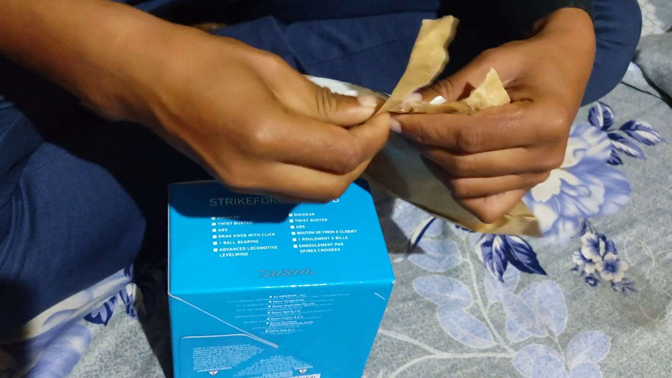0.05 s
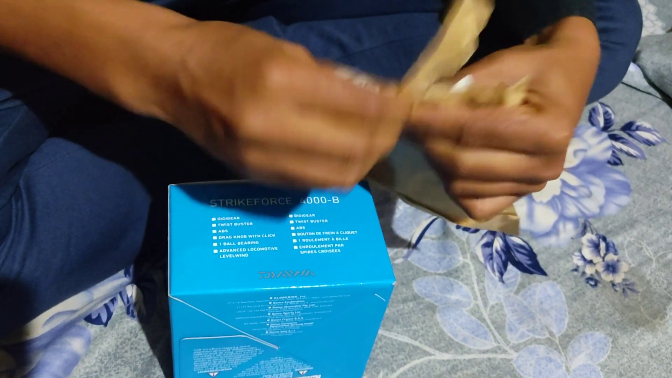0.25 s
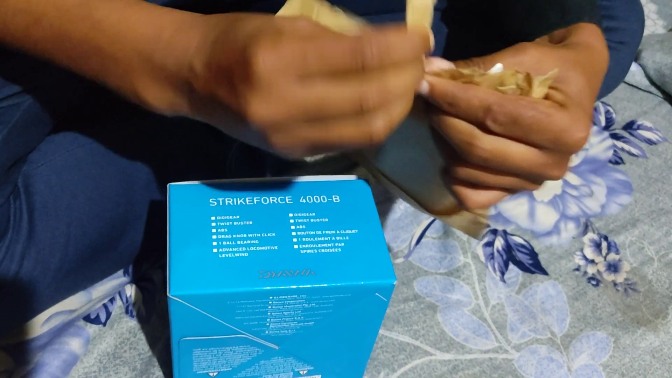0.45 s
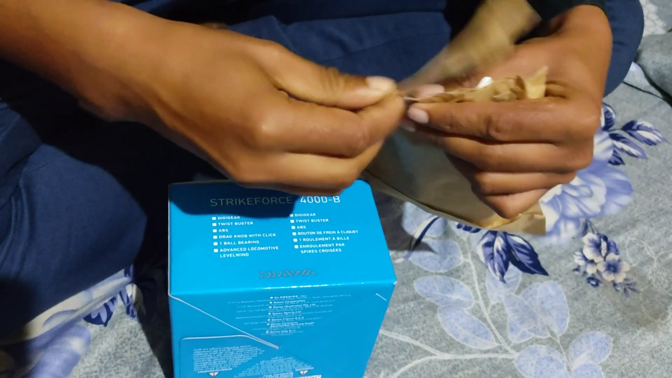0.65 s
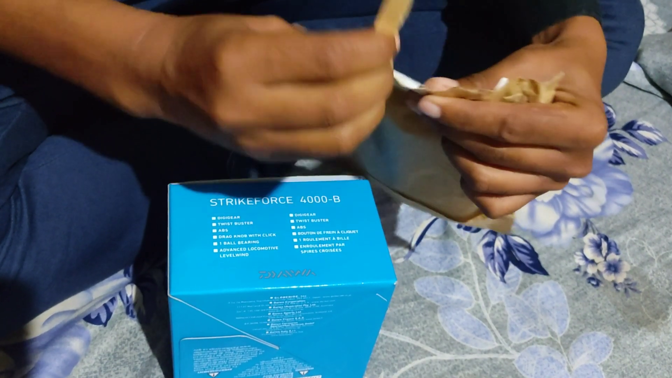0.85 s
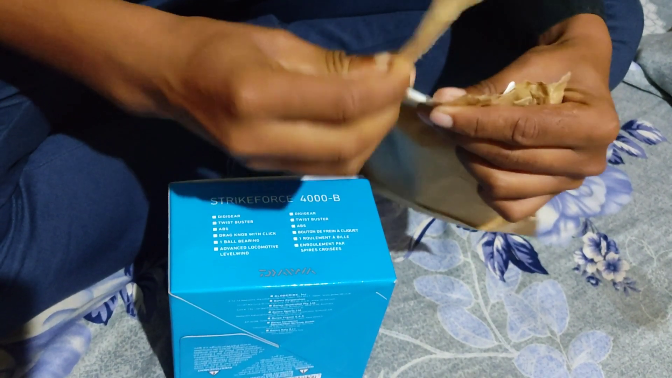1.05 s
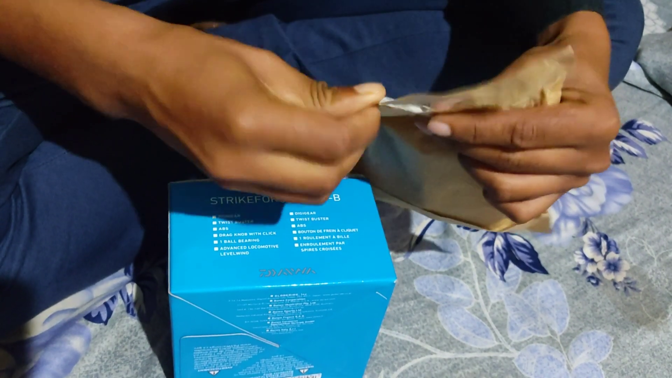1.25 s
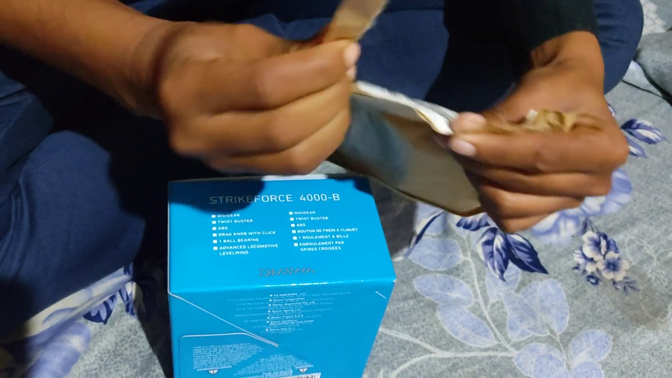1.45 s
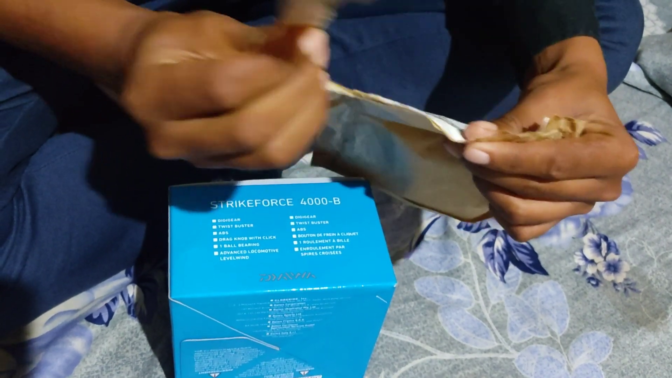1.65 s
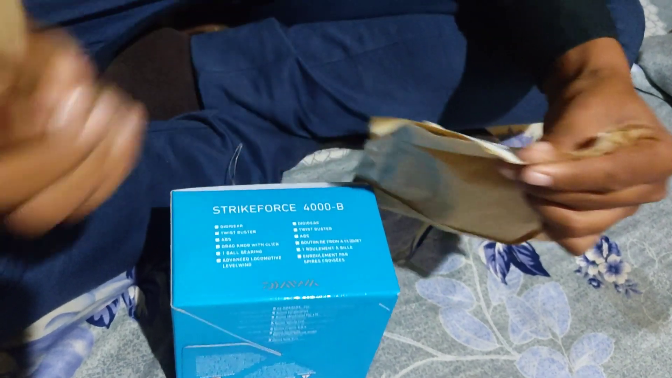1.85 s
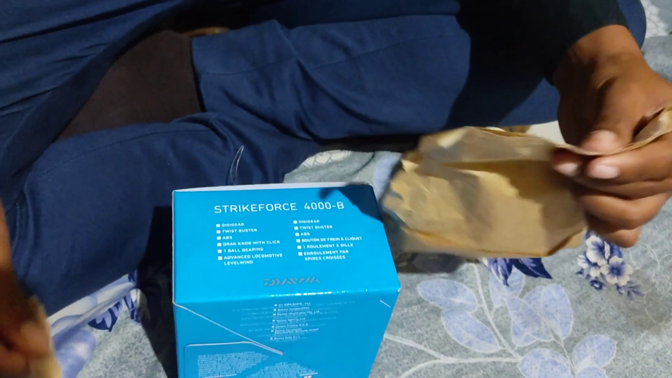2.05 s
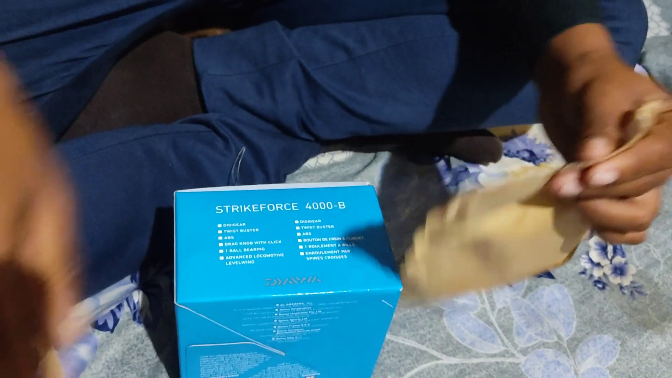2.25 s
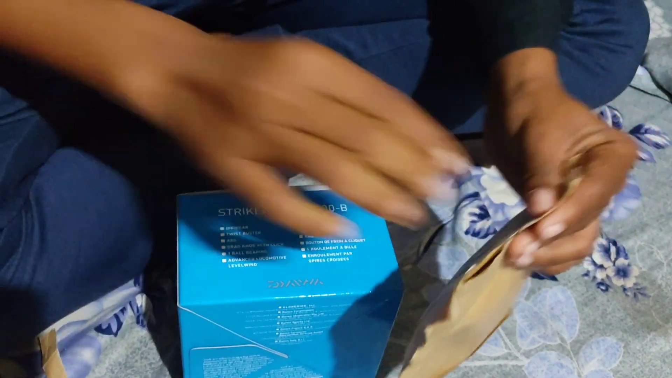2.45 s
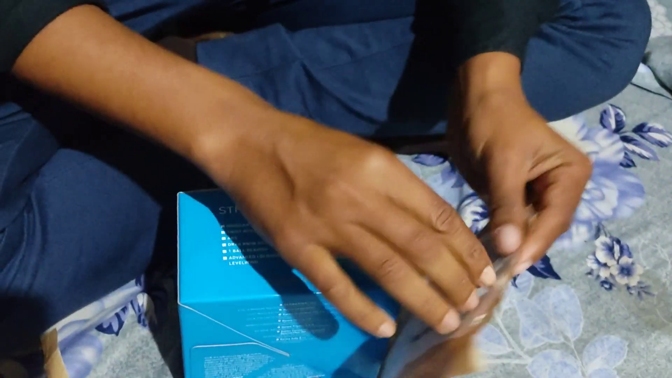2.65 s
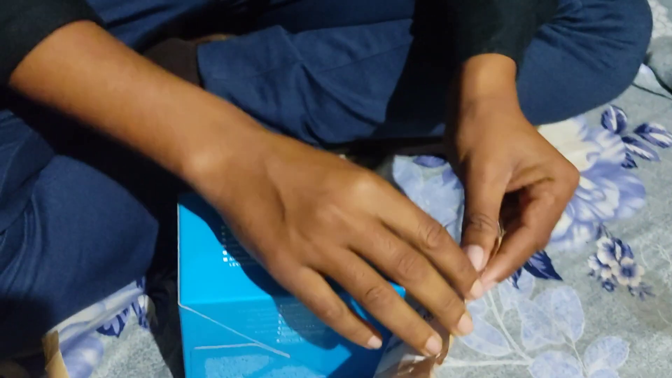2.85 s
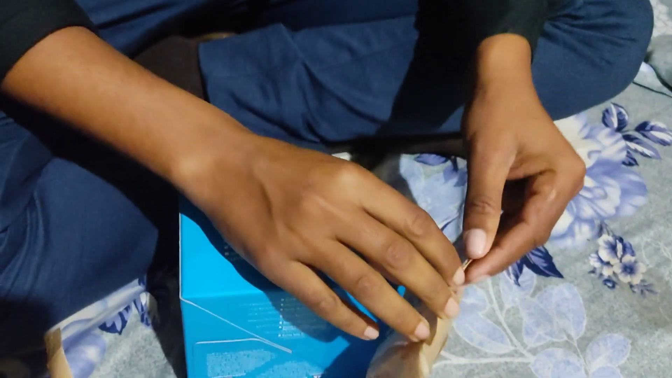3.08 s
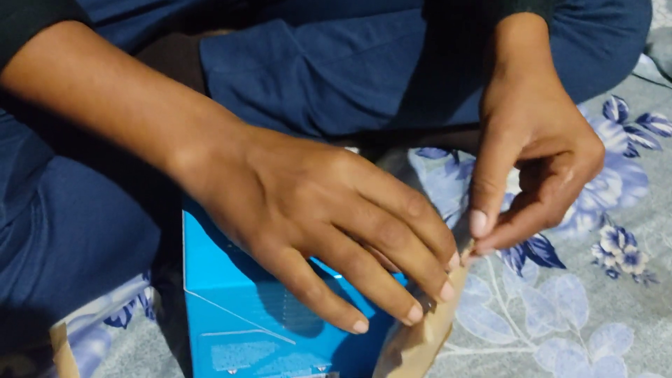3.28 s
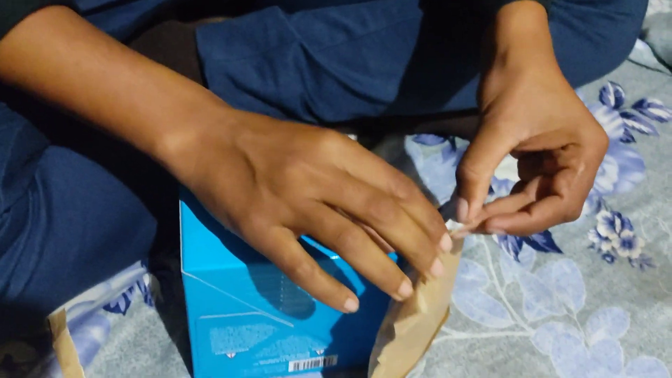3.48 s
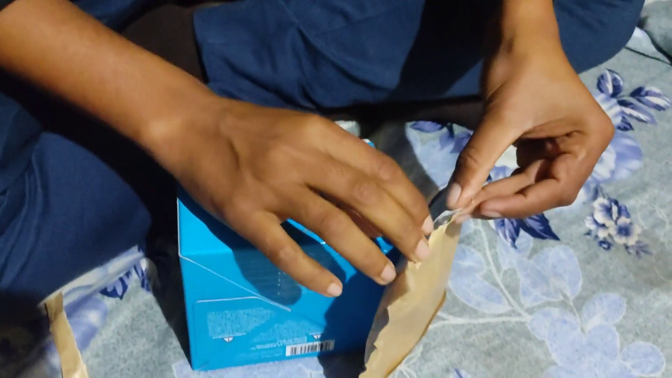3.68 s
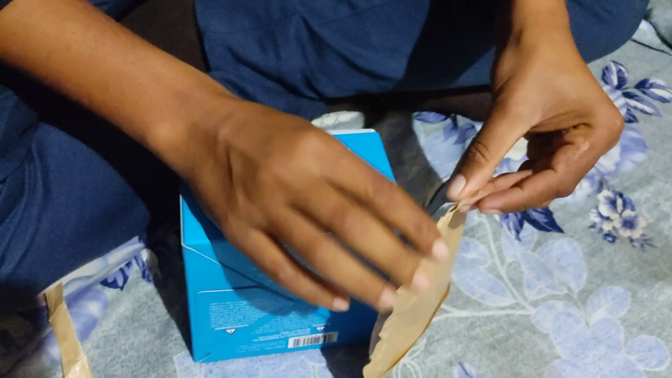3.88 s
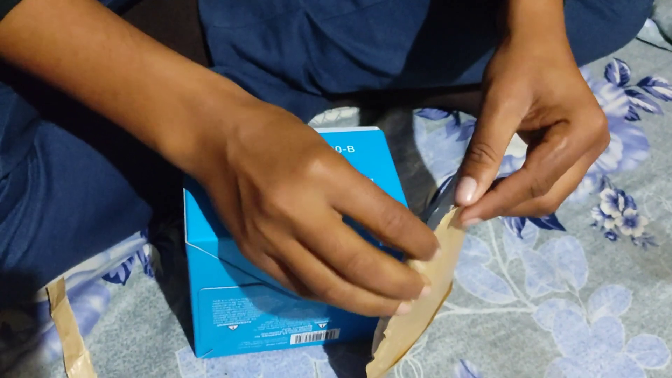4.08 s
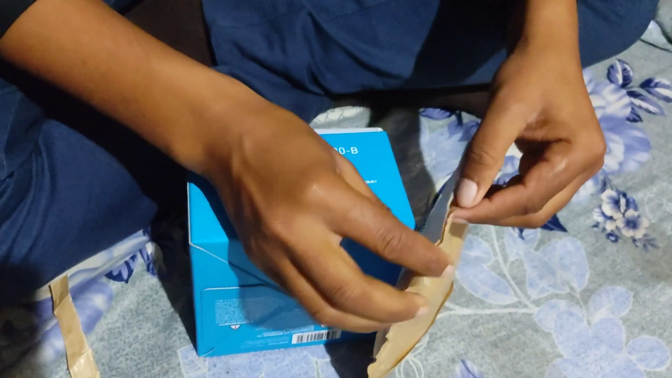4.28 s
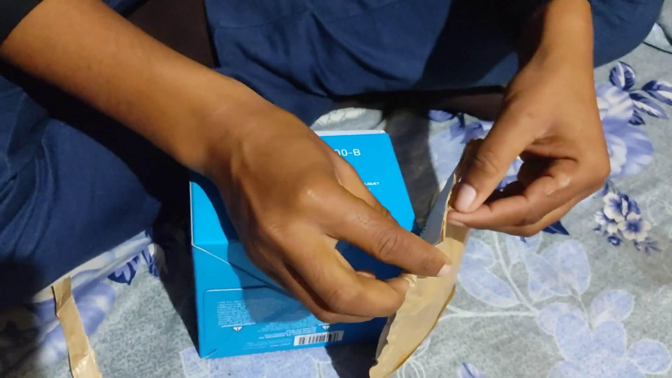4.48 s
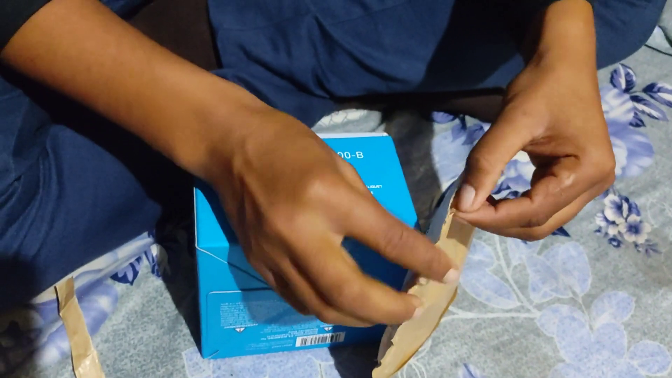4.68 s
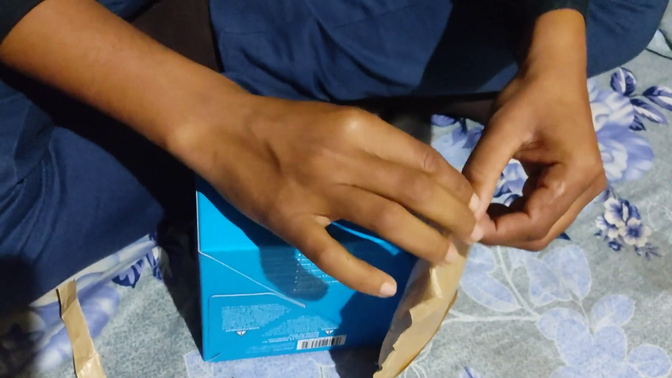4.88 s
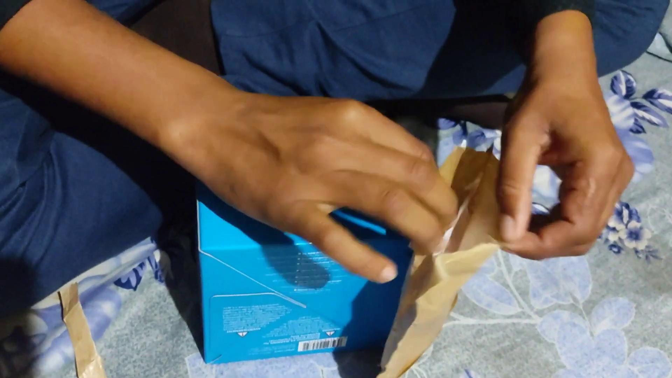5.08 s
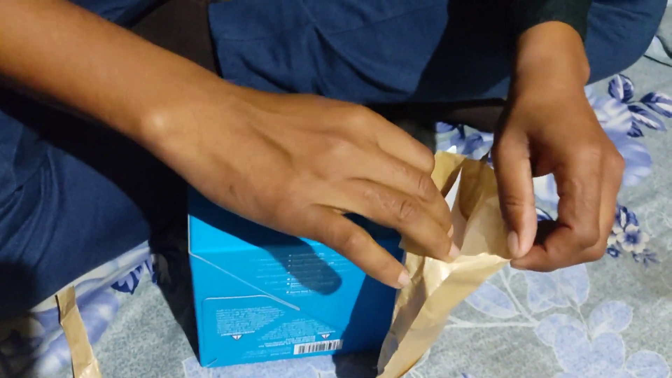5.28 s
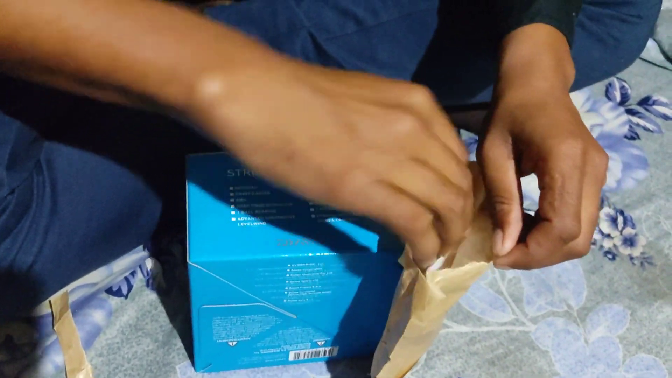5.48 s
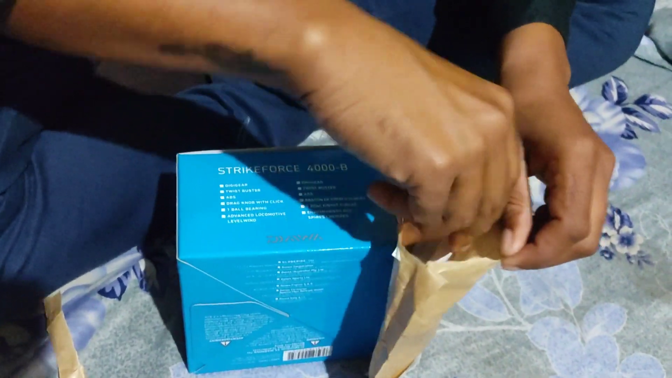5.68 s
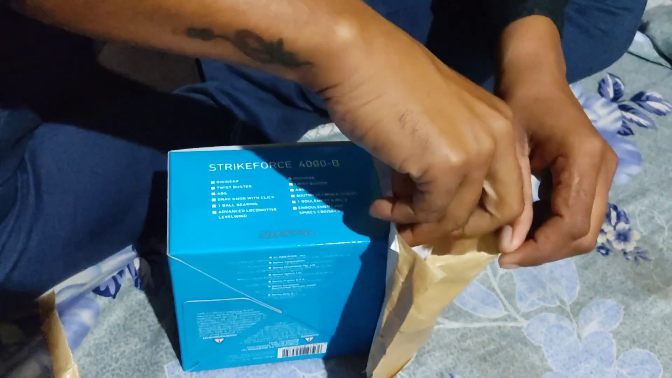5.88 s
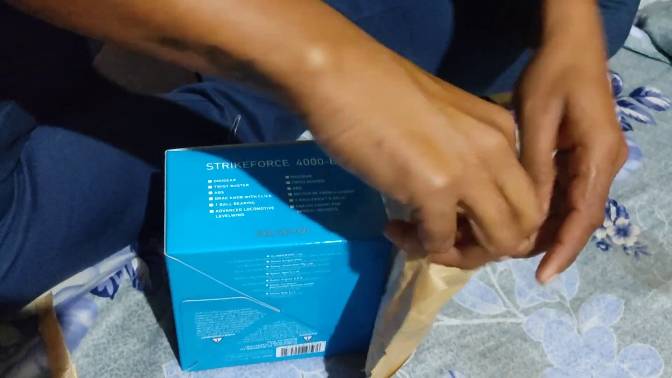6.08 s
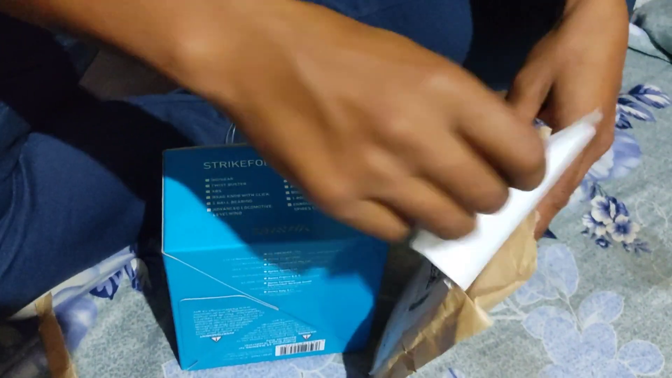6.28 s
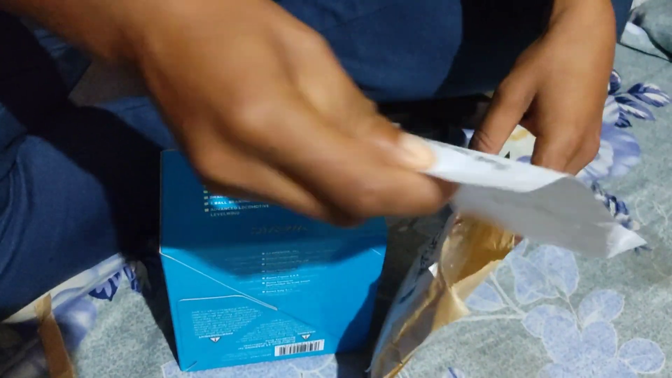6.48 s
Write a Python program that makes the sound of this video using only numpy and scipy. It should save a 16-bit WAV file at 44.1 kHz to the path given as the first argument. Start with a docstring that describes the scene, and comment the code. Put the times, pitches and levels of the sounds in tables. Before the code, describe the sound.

Close stereo pickup of stiff paper handled in a small furnished room, with short echoes and faint, steady air noise. Faint crinkles and small snaps start at once; at 0.3 s a sharp, dense, bright rip bursts out and dies by 0.5. After light rustling a second rip comes around 0.9. A longer, jerky tear runs from 1.4 to 1.65, running straight into a fourth until about 1.8. Crisp snaps and flexing follow at 1.85-2.1, then a firm crackling crease with a dull thump near 2.35-2.45. From 2.5 to 5 s the handling is quiet: delicate crinkles, sparse ticks, soft hollow pocket thumps. At 5.2-5.45 low papery thumps mark the envelope opening, with more crinkling. Two hard snaps strike at 5.96 and 6.04, then a sheet slides out with a dry, crackling rasp, strongest around 6.3, fading by the end at about 6.5.

```python
"""Tearing open a paper envelope

Hands tear a strip off a stiff envelope in four rips, then crease it, open it and pull out a sheet.
Breaking fibres are dense tiny clicks; sharp snaps are a crack and a short falling chirp.
The sheet flexes in bands of noise, and the air in the paper pocket thumps at low pitches.
A small furnished room adds echoes and steady air noise; two microphone ports each ring in the treble.
Levels in the tables hold before the room echoes and the ports."""
import sys
import numpy as np
from scipy import signal
from scipy.fft import rfft, irfft
from scipy.io import wavfile
from scipy.ndimage import uniform_filter1d

SR = 44100
rng = np.random.default_rng(int(sys.argv[2]) if len(sys.argv) > 2 else 0)


def wrap_up_sound(samples):
    """Save the sound to the file named by the first command line argument, as 16-bit audio."""
    columns = np.atleast_2d(samples).T
    # keep every value between -1 and 1, then stretch to whole-number steps
    tamed = np.clip(columns, -1, 1)
    steps = np.round(tamed * 32767).astype(np.int16)
    wavfile.write(sys.argv[1], SR, steps)


N = 288414


def from_db(db):
    """Turn decibels into a gain."""
    return 10 ** (np.asarray(db) / 20)


def rms_one(x):
    """Scale to an rms (average strength) of 1."""
    return x / np.sqrt(np.mean(x ** 2) + 1e-20)


def band(x, low_hz, high_hz):
    """Keep the pitches between two limits."""
    edges = [low_hz, min(high_hz, .45 * SR)]
    return signal.sosfilt(signal.butter(2, edges, "band", fs=SR, output="sos"), x)


def drift(rate_hz):
    """Slow random wander of spread 1: noise smoothed twice by a one-pole low-pass."""
    r = np.exp(-2 * np.pi * rate_hz / SR)
    wander = signal.lfilter([1], [1, -2 * r, r * r], rng.standard_normal(N + SR))
    return rms_one(wander[SR:])   # the first second lets the filter settle


def dying(t60, size):
    """Fading curve that falls 60 dB in t60 seconds."""
    return from_db(-60 * np.arange(size) / SR / t60)


def convolve(x, h):
    """Give x the response h, cut to the scene's length."""
    return signal.fftconvolve(x, h, axes=-1)[..., :N]


def pair(shared, size):
    """Stereo noise; the two channels have a share of their power in common."""
    mid, left, right = rng.standard_normal((3, size))
    shared = np.clip(shared, 0, 1)
    return np.sqrt(shared) * mid + np.sqrt(1 - shared) * np.array([left, right])


# colour of the room's air noise: (frequency [Hz], level per Hz before ROOM_TONE_DB [dB])
ROOM_TONE = [(3, 35.5), (12, 32), (30, 21.5), (90, 15.5), (380, 2), (630, -3), (1340, -11.5), (3000, -12),
             (9000, -16), (11000, -22), (15000, -16)]
ROOM_TONE_DB = -64


def room_tone():
    """Steady air noise over a deep sway: noise shaped by pitch, mostly separate at each port."""
    hz = np.maximum(np.fft.rfftfreq(N, 1 / SR), 1)
    table_hz, table_db = np.array(ROOM_TONE).T
    shape = from_db(np.interp(np.log(hz), np.log(table_hz), table_db))
    return from_db(ROOM_TONE_DB) * irfft(rfft(pair(0.13, N)) * shape, N)


# fingers crinkling the paper: (start [s], rise [s], hold [s],
#   fine crackle level [dB], sheet flexing level [dB], pocket boom level [dB])
CRINKLES = [(0, 0.00085, 0.075, -65.5, -70, -77.5), (0.117, 0.015, 0.044, -69, -69.5, -73),
            (0.208, 0.038, 0.1, -69, -69.5, -78), (0.483, 0.022, 0.23, -74, -79.5, -99),
            (0.769, 0.028, 0.074, -100, -67, -72), (1.052, 0.024, 0.018, -89, -69.5, -86),
            (1.123, 0.033, 0.0089, -70.5, -76, -72), (1.223, 0.028, 0.0069, -65, -74, -76),
            (1.366, 0.017, 0.031, -64, -61, -86), (1.848, 0.012, 0.01, -82, -59, -60),
            (1.935, 0.008, 0.026, -70, -67, -70), (2.005, 0.008, 0.091, -73.5, -66, -70.5),
            (2.197, 0.012, 0.014, -82, -74, -84), (2.26, 0.0053, 0.076, -75, -70, -75),
            (2.355, 0.0056, 0.01, -57, -56, -60.5), (2.372, 0.006, 0.023, -68, -62, -69),
            (2.416, 0.011, 0.0094, -56.5, -61, -71), (2.455, 0.029, 0.13, -70.5, -74, -89),
            (2.6, 0.018, 0.12, -74.5, -70, -75), (2.703, 0.018, 0.036, -82, -69.5, -83),
            (2.748, 0.017, 0.02, -71, -70.5, -67.5), (2.818, 0.037, 0.044, -84, -73.5, -72.5),
            (2.884, 0.024, 0.019, -71.5, -78, -70), (3.03, 0.02, 0.023, -77.5, -99, -75),
            (3.145, 0.076, 0.026, -67.5, -74.5, -79), (3.301, 0.018, 0.042, -75.5, -74, -84),
            (3.363, 0.021, 0.088, -74, -72, -74), (3.565, 0.082, 0.056, -68.5, -68.5, -70),
            (3.765, 0.086, 0.008, -86, -68, -69), (3.893, 0.053, 0.048, -93, -81, -84),
            (4.019, 0.037, 0.058, -69.5, -73, -72.5), (4.12, 0.03, 0.055, -80.5, -79, -80.5),
            (4.303, 0.039, 0.04, -73, -79, -76), (4.424, 0.018, 0.02, -78, -82, -79.5),
            (4.526, 0.037, 0.05, -79, -101, -102), (4.736, 0.027, 0.0076, -74, -92, -92),
            (4.83, 0.019, 0.23, -81, -83, -78), (5.0, 0.007, 0.021, -71, -72, -65),
            (5.053, 0.015, 0.057, -77, -72, -70), (5.205, 0.011, 0.057, -71.5, -66.5, -62),
            (5.307, 0.055, 0.061, -90, -79, -66), (5.429, 0.019, 0.036, -63.5, -66, -68),
            (5.577, 0.008, 0.066, -69, -67.5, -65.5), (5.692, 0.016, 0.034, -78, -81, -73.5),
            (5.764, 0.011, 0.025, -80, -71.5, -64.5), (5.804, 0.026, 0.19, -78, -77, -75),
            (5.953, 0.014, 0.011, -61.5, -53.5, -66), (6.029, 0.0096, 0.011, -58, -58, -63.5)]
CRINKLE_RISE_DB, CRINKLE_FADE_DB_PER_S = 15, 242


def crinkle_gains():
    """Gains of the three layers: each crinkle rises, holds and fades; overlapping powers add."""
    power, t = np.zeros((3, N)), np.arange(N) / SR
    for start, rise, hold, *levels_db in CRINKLES:
        i = int(start * SR)
        j = int((start + rise + hold) * SR) + SR // 4
        since = t[i:j] - start
        rise_db = np.minimum(CRINKLE_RISE_DB * (since / max(rise, .001) - 1), 0)
        fade_db = CRINKLE_FADE_DB_PER_S * np.maximum(since - rise - hold, 0)
        power[:, i:j] += from_db(np.add.outer(levels_db, rise_db - fade_db)) ** 2
    return np.sqrt(power)


RUSTLE_PER_S, RUSTLE_SPREAD_DB, RUSTLE_TOP_HZ = 1800, 1.5, 11700   # rate before clumping
TICKS_PER_S, TICK_SPREAD_DB, TICK_TOP_HZ = 110, 3, 15300   # rate before clumping
RUSTLE_CLUMP_DB = 3.3
TICKS_DB = -6.5   # relative to the fine crinkles


def rustle():
    """Handling: fine, duller crinkles, with sparse small creases ticking among them."""
    fine = fibres(RUSTLE_PER_S, RUSTLE_SPREAD_DB, RUSTLE_TOP_HZ, RUSTLE_CLUMP_DB)
    ticks = fibres(TICKS_PER_S, TICK_SPREAD_DB, TICK_TOP_HZ, RUSTLE_CLUMP_DB)
    total = 0
    for gain, fine_layer, tick_layer in zip(crinkle_gains(), fine, ticks):
        total = total + gain * (fine_layer + from_db(TICKS_DB) * tick_layer)
    return total


# broad resonances of the stiff sheet: (frequency [Hz], width [Hz], level before the wander [dB])
SHEET = [(1000, 430, 3), (2210, 1060, -2.5), (3960, 590, 3.5)]
SHEET_WANDER_DB = 3.5   # each resonance swells and fades as the sheet changes shape


def fibres(per_s, spread_db, top_hz, clump_db):
    """Fibres crackle; slower buckles, partly in step with them, flex the sheet and boom in the pocket."""
    crackle = rms_one(breaks(per_s, spread_db, clump_db, t60=0.0068))
    buckles = rms_one(breaks(per_s * .5, spread_db, clump_db, t60=0.017)) + .5 * crackle
    pocket = band(buckles.sum(axis=0), 101, 407)   # long waves reach both ports alike
    sheet = from_db(-2.0) * band(buckles, 970, 3630)
    for hz, width_hz, level_db in SHEET:
        gain = from_db(level_db + SHEET_WANDER_DB * drift(11))
        sheet = sheet + gain * signal.lfilter(*signal.iirpeak(hz, hz / width_hz, fs=SR), buckles)
    return rms_one(band(crackle, 4270, top_hz)), rms_one(bent(sheet, .5)), rms_one(pocket)


def breaks(per_s, spread_db, clump_db, t60, count=9):
    """Clumped clicks dealt to spots on the paper; each spot reaches the ports by its own short path."""
    strength = from_db(spread_db * np.minimum(rng.exponential(1, N), 2.5))
    sizes = strength * rng.choice([-1, 1], N)
    rate = per_s * from_db(clump_db * (drift(200) + drift(40)))
    clicks = sizes * (rng.random(N) < rate / SR)
    spot = rng.integers(0, count, N)
    total = 0
    for k in range(count):
        path = pair(0.2, size=512) * dying(t60, size=512)
        total = total + convolve((clicks * (spot == k))[None], path)
    return total


# travel time over the whole sheet: of a 1 kHz bending wave, and of the crack it is counted from
BEND_S, BEND_FIRST_S = .008, .003


def bent(x, reach):
    """Bending waves travel faster the higher their pitch (as its root): a quick downward chirp."""
    hz = np.fft.rfftfreq(x.shape[-1], 1 / SR)
    turns = reach * (2 * BEND_S * np.sqrt(1000 * hz) - BEND_FIRST_S * hz)   # reach: share of the sheet
    return irfft(rfft(x) * np.exp(-2j * np.pi * turns), x.shape[-1])


ROOM_T60_S, WALL_CUT_HZ, ROOM_DB = 0.21, 15000, -11


def room(x):
    """Diffuse echoes: dull noise that starts after 4 ms and dies away, partly alike at the two ports."""
    size = SR // 2
    tail = pair(0.49, size) * dying(ROOM_T60_S, size) * (np.arange(size) > .004 * SR)
    tail = signal.sosfilt(signal.butter(1, WALL_CUT_HZ, fs=SR, output="sos"), tail)
    return from_db(ROOM_DB) * convolve(x, tail / np.sqrt(np.sum(tail ** 2) / 2))


# sharp snaps of the paper, from creases and from bursts within the rips; levels before panning:
#   (time [s], crack peak level [dB], sheet ring pitch [Hz], ring peak level [dB])
SNAPS = [(0.025, -62, 2000, -52.5), (0.1376, -74, 945, -51.5), (0.158, -58, 923, -59),
         (0.2314, -51, 1220, -75), (0.245, -53, 1220, -50), (0.261, -64, 1980, -45.5),
         (0.2832, -48, 1220, -51), (0.314, -27, 2930, -58), (0.3188, -34, 1200, -55),
         (0.3293, -27, 2500, -51), (0.346, -26, 1100, -56), (0.367, -40, 1100, -45),
         (0.382, -38, 2400, -44), (0.388, -44, 2400, -45), (0.6061, -45, 2550, -54.5),
         (0.645, -70, 1480, -61), (0.755, -64, 2000, -59), (0.778, -55, 1500, -62),
         (0.7989, -74, 1150, -46), (0.8388, -42, 4100, -42), (0.8643, -54, 2260, -44),
         (0.876, -40, 2500, -50), (0.8855, -36, 1500, -55), (0.8933, -41, 1200, -47),
         (0.906, -27, 1540, -37), (0.912, -40, 2200, -36), (0.931, -27, 1110, -35), (0.938, -35, 2400, -39),
         (1.089, -66, 1570, -47), (1.159, -58, 780, -62), (1.253, -44, 1330, -56.5),
         (1.3702, -44, 1360, -51), (1.405, -38, 940, -44), (1.4157, -29, 1000, -37),
         (1.438, -35, 1500, -40), (1.462, -36, 1290, -40), (1.5026, -35, 2500, -47),
         (1.538, -28, 1500, -45), (1.547, -35, 2000, -48), (1.687, -33, 2100, -55), (1.718, -27, 2150, -48),
         (1.7477, -26, 1260, -52), (1.8609, -34, 2320, -28.5), (1.874, -43, 2360, -60),
         (1.9025, -36, 2010, -42), (1.911, -60, 1080, -48.5), (1.943, -31, 1470, -45.5),
         (1.966, -55, 2270, -40.5), (2.0113, -45, 2210, -59), (2.0162, -34, 2260, -52),
         (2.0352, -43, 1000, -49), (2.052, -62, 1300, -65), (2.0745, -38.5, 1730, -39.5),
         (2.09, -51, 1900, -55), (2.142, -51, 2130, -44), (2.144, -72, 900, -47), (2.208, -55, 703, -61.5),
         (2.2636, -45, 900, -54), (2.352, -59, 2200, -58), (2.362, -36, 2330, -34.5),
         (2.365, -50, 690, -42), (2.3692, -29, 1960, -31.5), (2.381, -40, 2030, -56),
         (2.3985, -48, 2020, -64), (2.429, -29, 2460, -43), (2.443, -48, 2170, -61),
         (2.547, -52, 3000, -56), (2.637, -55, 1460, -52), (2.696, -69, 1500, -54.5),
         (2.709, -68, 1690, -56), (2.766, -52.5, 780, -56.5), (2.782, -56, 700, -62),
         (2.871, -70, 2020, -47), (2.921, -49, 1260, -59.5), (3.0042, -57, 2520, -63),
         (3.044, -67, 1200, -63.5), (3.227, -54, 1170, -61), (3.325, -54, 1500, -52),
         (3.382, -63, 2220, -51), (3.4444, -46, 2310, -50), (3.468, -53, 1800, -61),
         (3.506, -49.5, 1570, -64), (3.6635, -44, 1480, -70), (3.686, -62, 1500, -55),
         (3.702, -69, 2200, -48.5), (3.845, -66, 1650, -58), (3.856, -55, 4000, -51.5),
         (3.896, -62, 2600, -49.5), (4.189, -81, 1360, -58.5), (4.439, -66, 2000, -72),
         (4.613, -53, 3240, -75), (4.759, -58, 2500, -74), (4.773, -55, 2000, -71),
         (4.8502, -51, 2640, -46.5), (5.008, -48.5, 2200, -50), (5.055, -62, 3500, -54),
         (5.069, -41.5, 1670, -50), (5.083, -47.5, 2000, -65), (5.12, -68, 1500, -60),
         (5.19, -55, 1200, -61), (5.215, -45.5, 2600, -51), (5.217, -70, 1090, -49.5),
         (5.265, -48, 2000, -46), (5.4004, -55.5, 1500, -51), (5.586, -44.5, 1560, -55.5),
         (5.632, -50, 2470, -54), (5.658, -52, 2300, -59), (5.717, -57, 3000, -68),
         (5.7754, -62, 3540, -46), (5.779, -70, 690, -49.5), (5.8019, -60, 1760, -58.5),
         (5.9646, -31, 3420, -32), (5.978, -47, 2380, -54), (6.0063, -54, 1690, -49),
         (6.0405, -32.5, 2840, -33.5), (6.054, -44, 1400, -49.5), (6.133, -60, 1510, -49.5),
         (6.179, -45, 1270, -45), (6.252, -53, 2000, -53), (6.279, -56, 2210, -42),
         (6.3133, -51, 1510, -41), (6.318, -45, 1000, -41), (6.329, -34.5, 2000, -49),
         (6.3608, -58, 3200, -35), (6.432, -51, 2350, -50)]
CRACK_T60_S, RING_T60_S = .007, .009
SNAP_PAN_DB, SNAP_PAN_SPREAD_DB = -2, 3   # left minus right


def snaps(size=2048):
    """A sharp crack; the bending waves of the sheet follow as a short, broad, falling chirp."""
    out = np.zeros((2, N + size))
    for time, crack_db, hz, ring_db in SNAPS:
        pan_db = SNAP_PAN_DB + SNAP_PAN_SPREAD_DB * rng.standard_normal()
        crack = band(pair(0.59, size) * dying(CRACK_T60_S, size), 3350, 14000)
        ring = band(pair(0.6, size) * dying(RING_T60_S, size), hz * .68, hz * 1.38)
        ring = bent(ring, rng.uniform(.2, .5))
        both = from_db(crack_db) * crack / np.abs(crack).max()
        both = both + from_db(ring_db) * ring / np.abs(ring).max()
        i = round(time * SR)
        out[:, i:i + size] += from_db(np.array([[.5], [-.5]]) * pan_db) * both
    return out[:, :N]


def in_time(spans):
    """Turn each table column into a signal, with a gain that is zero between the spans."""
    t = np.arange(N) / SR
    times, *columns = np.transpose(np.vstack(spans))
    sounding = sum((t >= rows[0][0]) & (t < rows[-1][0]) for rows in spans)
    smooth = uniform_filter1d(np.minimum(sounding, 1.), size=400)   # softens the on and off edges
    return smooth, [np.interp(t, times, column) for column in columns]


# force of the four rips and of the sheet sliding out, as crackle before the jerks;
# one list each: (time [s], level [dB])
RIPS = [
    [(0.324, -61), (0.334, -41), (0.352, -40), (0.388, -36.5), (0.412, -46), (0.5, -70.5)],
    [(0.855, -71), (0.865, -54.5), (0.882, -52.5), (0.888, -45), (0.913, -37), (0.989, -47.5), (1.07, -74)],
    [(1.385, -83), (1.4, -42.5), (1.42, -39), (1.475, -41), (1.505, -38), (1.545, -39.5), (1.583, -46),
     (1.67, -57.5)],
    [(1.67, -53), (1.684, -51), (1.688, -45.5), (1.774, -39.5), (1.796, -49.5), (1.855, -66)],
    [(6.08, -71.5), (6.15, -55), (6.234, -54.5), (6.31, -54), (6.32, -50.5), (6.438, -65.5), (6.54, -74.5)],
]
# how hard each of them shakes the paper at full force, before the jerks:
#   (sheet flexing level [dB], pocket boom level [dB])
RIP_BODY = [(-42, -55), (-39.5, -51.5), (-42.5, -49), (-44.5, -52), (-41, -45)]
RIP_PER_S, RIP_SPREAD_DB, RIP_TOP_HZ, RIP_CLUMP_DB = 2100, 1.9, 18000, 1.2   # rate before clumping
FULL_FORCE_DB = -35
SHEET_FOLLOWS, POCKET_FOLLOWS = 0.86, 0.89   # share of the force's swing in dB
JERK_SHEET_SHARE = 0.63   # share of each jerk's dB that reaches the sheet
POCKET_LAG_S = 0.011


def rips():
    """Tearing and the sheet sliding out: dense, bright breaks; sheet and, later, pocket follow the force."""
    sounding, (force_db,) = in_time(RIPS)
    crackle, sheet, pocket = fibres(RIP_PER_S, RIP_SPREAD_DB, RIP_TOP_HZ, RIP_CLUMP_DB)
    jerk_db = jerks()
    which = np.searchsorted([rows[0][0] for rows in RIPS[1:]], np.arange(N) / SR)
    sheet_db, pocket_db = np.transpose(RIP_BODY)[:, which]
    under_db = force_db - FULL_FORCE_DB
    crackle_gain = from_db(force_db + jerk_db)
    sheet_gain = from_db(sheet_db + SHEET_FOLLOWS * under_db + JERK_SHEET_SHARE * jerk_db)
    pocket_gain = sounding * from_db(pocket_db + POCKET_FOLLOWS * under_db)
    r = np.exp(-1 / (POCKET_LAG_S * SR))
    late_gain = signal.lfilter([1 - r], [1, -r], pocket_gain)
    return sounding * (crackle_gain * crackle + sheet_gain * sheet) + late_gain * pocket


# brief changes of force while tearing or sliding the sheet:
#   (time [s], change at the peak, up or down [dB])
JERKS = [(0.3324, 6), (0.347, 2.5), (0.3664, 0), (0.3859, 0), (0.4385, 3.0), (0.8757, 0), (0.8856, 2.5),
         (0.913, 1.5), (0.9299, 2), (0.9922, 3.5), (1.412, 3.0), (1.4177, 6.5), (1.4267, -1.5), (1.4367, 3),
         (1.4666, 4), (1.504, 0.5), (1.5222, 4), (1.5469, 2.5), (1.5659, 1), (1.587, 3.5), (1.6017, 0),
         (1.6856, 3), (1.6922, 2.5), (1.72, 3), (1.7326, 0.5), (1.7476, -2), (1.7773, 4.5), (6.1861, 0),
         (6.2349, 2), (6.3176, 4.5), (6.3301, 5.5), (6.3605, 0), (6.4185, 2)]
JERK_RISE_S, JERK_FADE_S = .0004, .006   # time constants


def jerks():
    """Change of force in dB: a quick rise or dip that eases back."""
    out, t = np.zeros(N), np.arange(N) / SR
    for time, change_db in JERKS:
        i = slice(int((time - .005) * SR), int((time + .04) * SR))
        since = t[i] - time
        out[i] += change_db * np.exp(np.where(since < 0, since / JERK_RISE_S, -since / JERK_FADE_S))
    return out


# the pocket pushed or knocked: (time [s], level before the soft start and fade [dB], pitch [Hz])
THUMPS = [(0.353, -38, 397), (0.898, -46, 286), (1.163, -48.5, 165), (1.389, -50, 362), (1.434, -35, 447),
          (1.475, -40, 346), (1.52, -37, 163), (1.701, -55, 339), (1.864, -54, 450), (1.876, -59, 250),
          (1.944, -44, 400), (2.078, -48, 506), (2.146, -54, 487), (2.294, -50.5, 424), (2.364, -35.5, 312),
          (2.433, -42.5, 450), (2.619, -43, 282), (2.634, -51, 340), (2.764, -54, 500), (2.983, -52.5, 316),
          (3.225, -48, 284), (3.236, -51, 430), (3.384, -47.5, 293), (3.399, -47.5, 353),
          (3.675, -47.5, 325), (3.688, -43.5, 480), (3.835, -44.5, 567), (4.186, -49.5, 362),
          (4.686, -52, 460), (5.012, -59, 350), (5.111, -51.5, 128), (5.22, -41, 350), (5.264, -32.5, 352),
          (5.336, -50, 170), (5.354, -47, 177), (5.368, -42, 171), (5.387, -41, 171), (5.418, -44.5, 164),
          (5.59, -41, 403), (5.775, -44, 276), (5.967, -46, 515), (6.043, -42, 367), (6.146, -43, 378),
          (6.186, -51, 340), (6.249, -45, 330), (6.316, -42, 340)]


def thumps(size=8192):
    """Air in the pocket swings for a few cycles after a soft push."""
    out, t = np.zeros(N + size), np.arange(size) / SR
    soft_start = 1 - np.exp(-t / 0.0026)
    for time, level_db, hz in THUMPS:
        swing = np.sin(2 * np.pi * hz * t) * dying(8.9 / hz, size) * soft_start
        i = round(time * SR)
        out[i:i + size] += from_db(level_db) * swing
    return out[:N]


LEFT_LAG = 9   # samples


def scene():
    """Paper close to the ports, a little nearer the right one, so the left hears it later."""
    paper = rips() + rustle() + snaps() + thumps()
    paper[0] = np.roll(paper[0], LEFT_LAG)
    return paper + room(paper) + room_tone()


# colour of the microphone ports: (frequency [Hz], left level [dB], right level [dB])
PORTS = [(95.6, 0.5, -3), (483, 9, 4), (690, 6.5, 4.5), (1000, 7, 6.5), (2110, 8, 7), (2470, 11, 5.5),
         (2840, 6, 5), (3430, 4, 4.5), (3900, 2, 3.5), (4590, 1.5, 4), (5260, 4, 6), (5760, 0, 8),
         (6310, 4.5, 9.5), (7140, -9, 18), (7740, -21, 19), (8210, 20, 4.5), (8510, 9, 15),
         (9160, 10.5, 10), (10200, -3, -8.5), (12100, -8, -6), (13500, -13.5, -5.5), (15700, -1, -16.5)]


def ports(size=2048):
    """Responses of the two ports that ring as early as they can (minimum phase, via the cepstrum)."""
    hz, *levels_db = np.transpose(PORTS)
    grid = np.log(np.maximum(np.fft.rfftfreq(size, 1 / SR), 1))
    log_gains = [np.log(from_db(np.interp(grid, np.log(hz), db))) for db in levels_db]
    cepstrum = irfft(log_gains, size)
    cepstrum[:, 1:size // 2] *= 2   # fold the second half onto the first
    cepstrum[:, size // 2 + 1:] = 0
    return irfft(np.exp(rfft(cepstrum)), size)


CUTOFF_HZ = 16100   # from here up, 70 dB down


def record(dry):
    """The ports colour the sound, then a steep low-pass cuts the top."""
    low_pass = signal.cheby2(14, 70, CUTOFF_HZ, fs=SR, output="sos")
    return signal.sosfilt(low_pass, convolve(dry, ports()))


dry = scene()
out = record(dry)
wrap_up_sound(out)
```